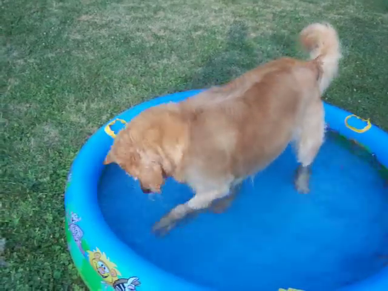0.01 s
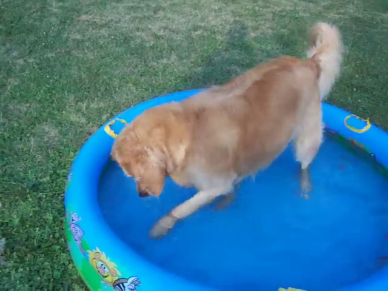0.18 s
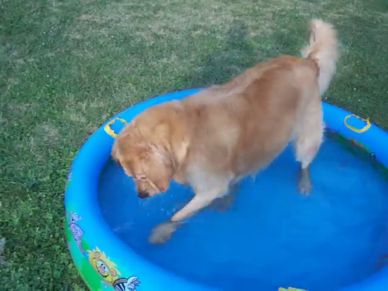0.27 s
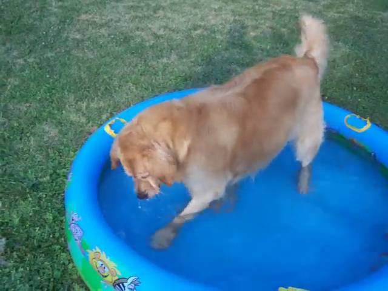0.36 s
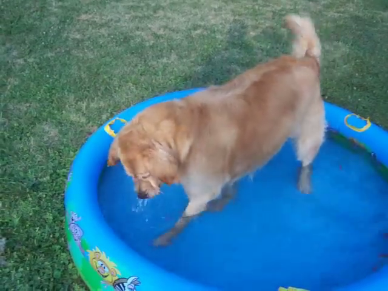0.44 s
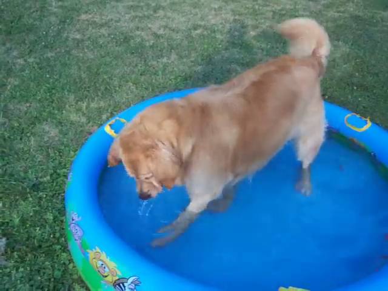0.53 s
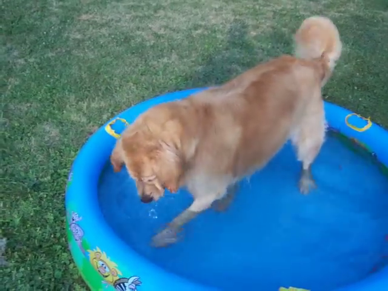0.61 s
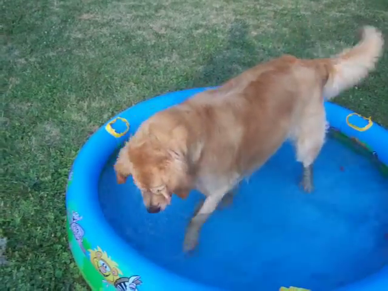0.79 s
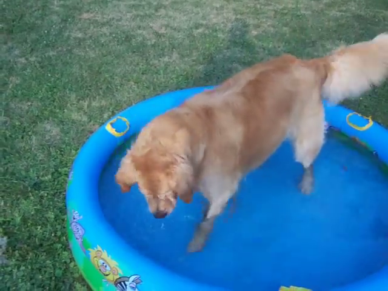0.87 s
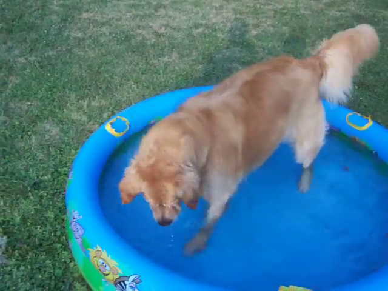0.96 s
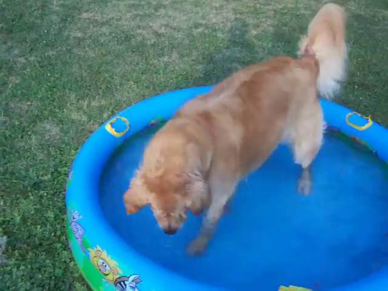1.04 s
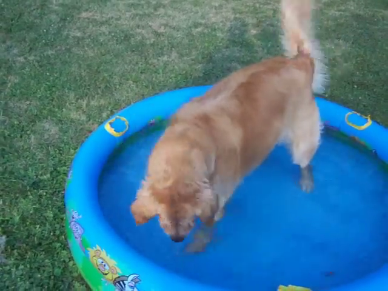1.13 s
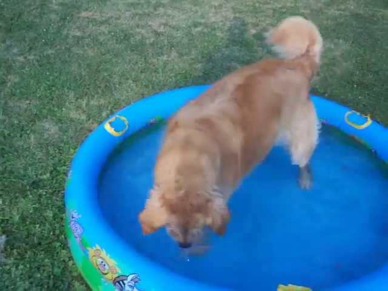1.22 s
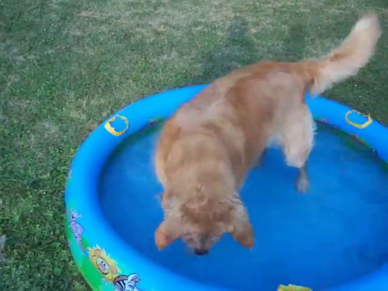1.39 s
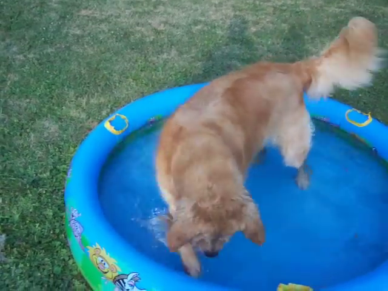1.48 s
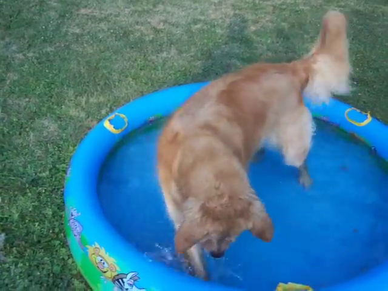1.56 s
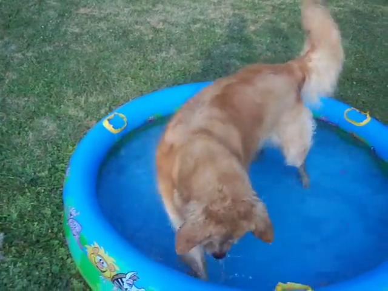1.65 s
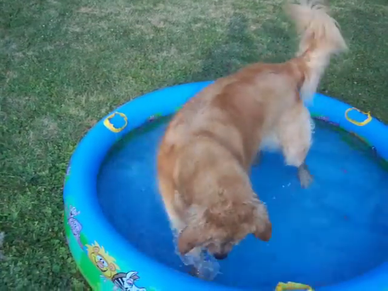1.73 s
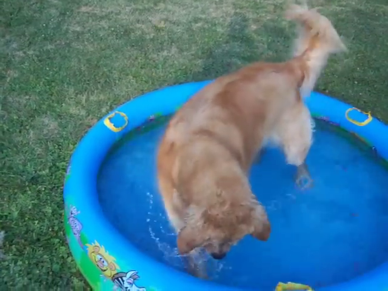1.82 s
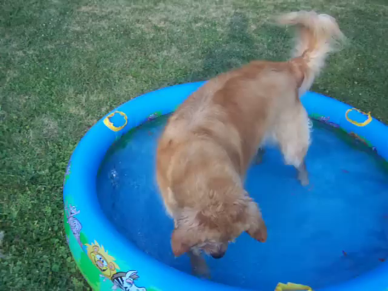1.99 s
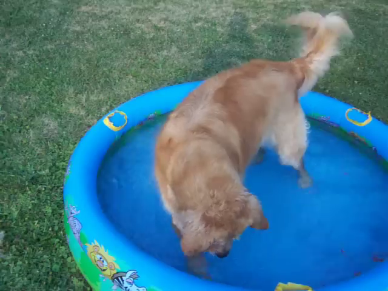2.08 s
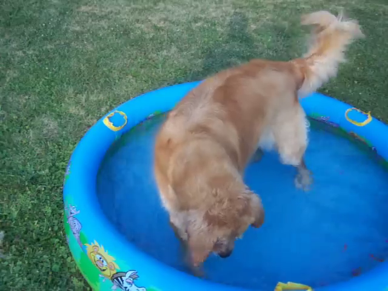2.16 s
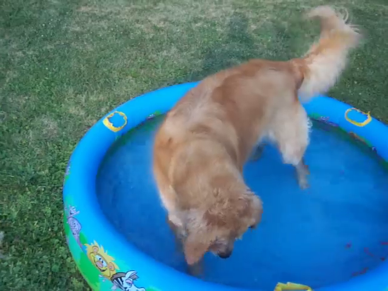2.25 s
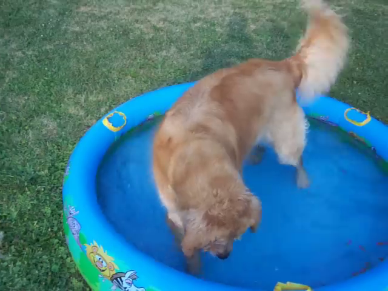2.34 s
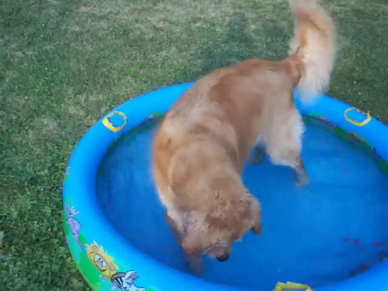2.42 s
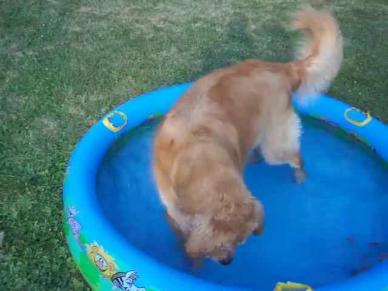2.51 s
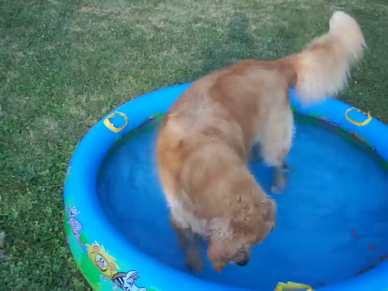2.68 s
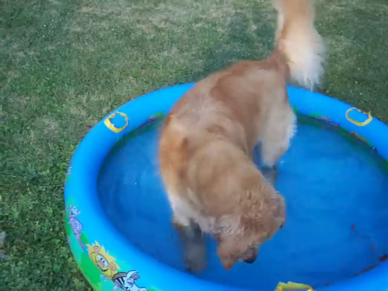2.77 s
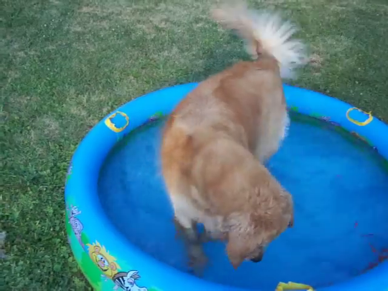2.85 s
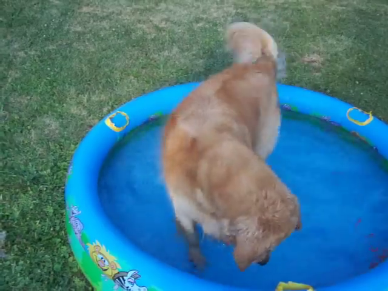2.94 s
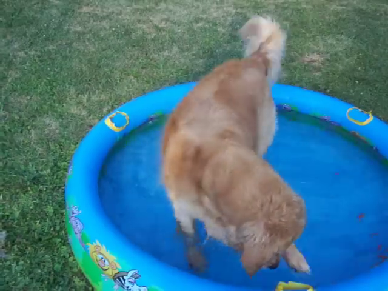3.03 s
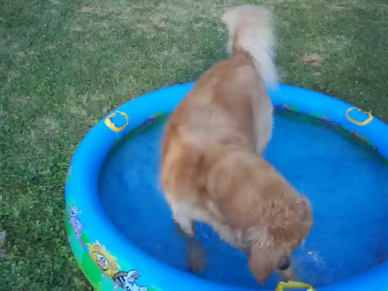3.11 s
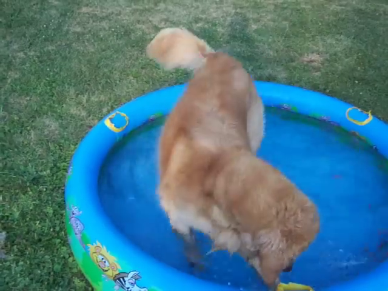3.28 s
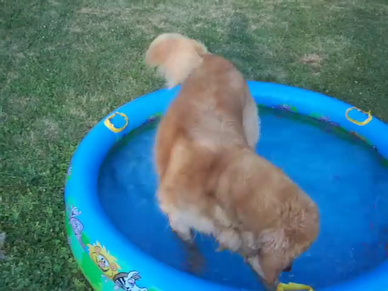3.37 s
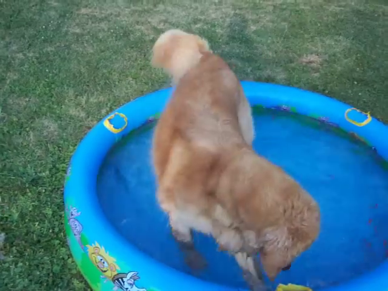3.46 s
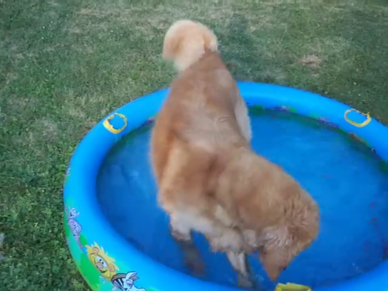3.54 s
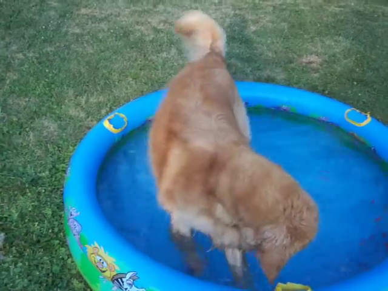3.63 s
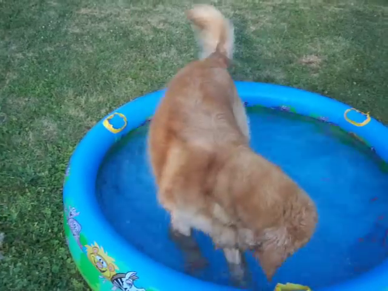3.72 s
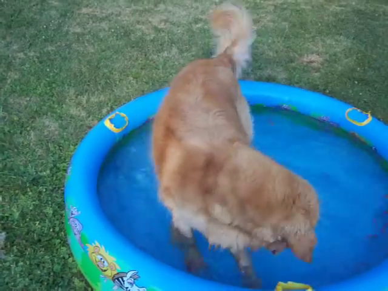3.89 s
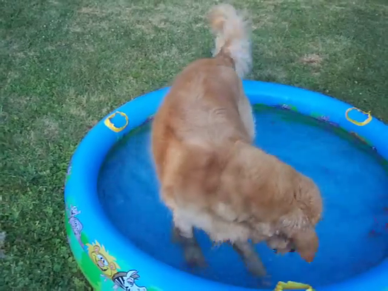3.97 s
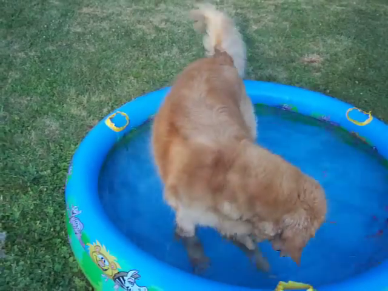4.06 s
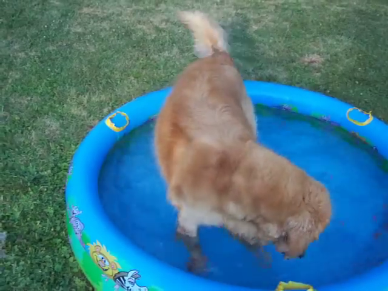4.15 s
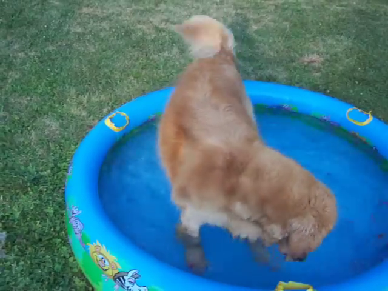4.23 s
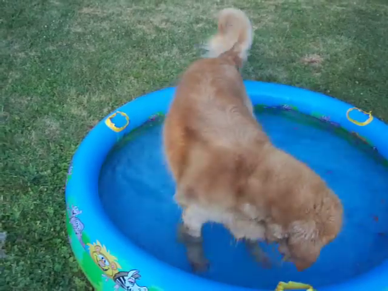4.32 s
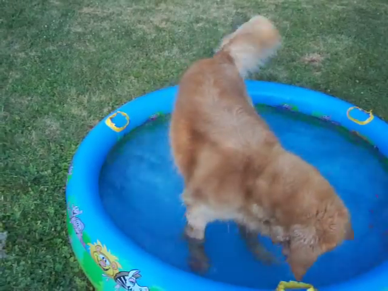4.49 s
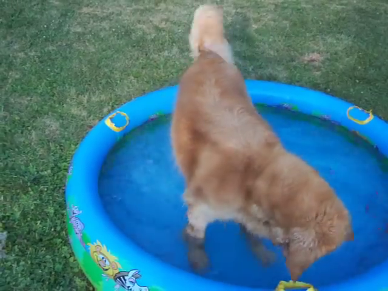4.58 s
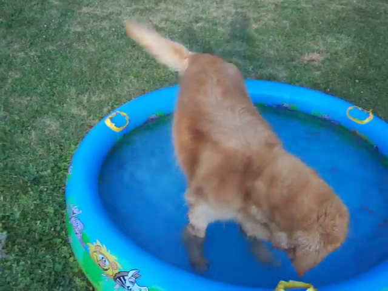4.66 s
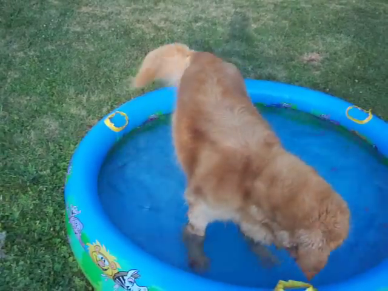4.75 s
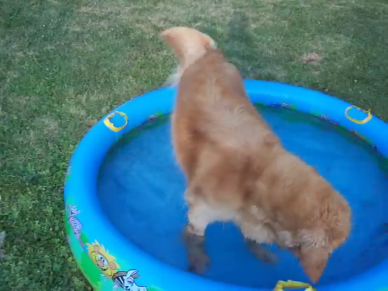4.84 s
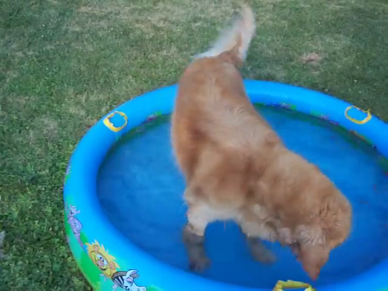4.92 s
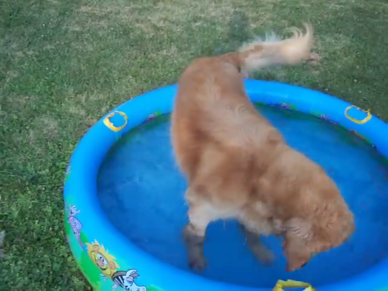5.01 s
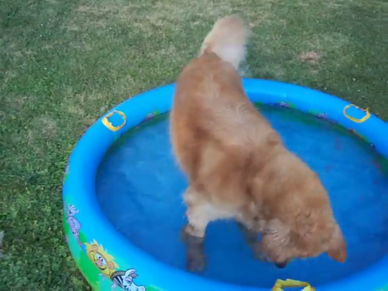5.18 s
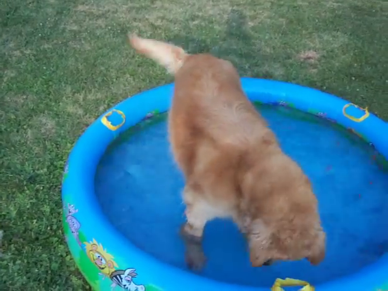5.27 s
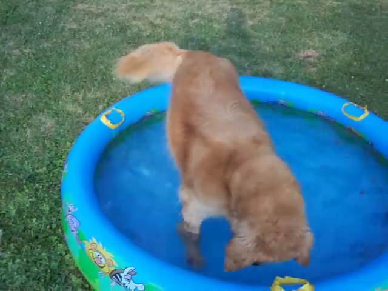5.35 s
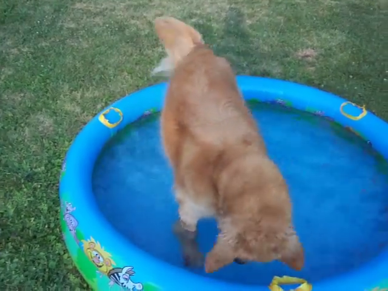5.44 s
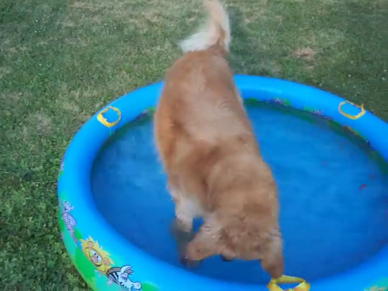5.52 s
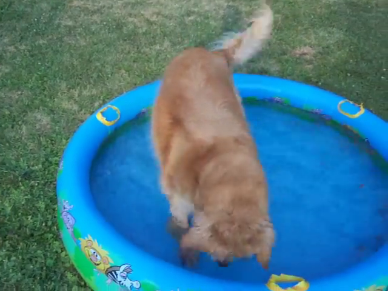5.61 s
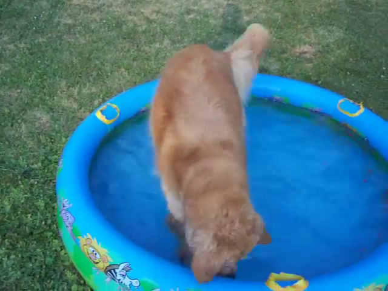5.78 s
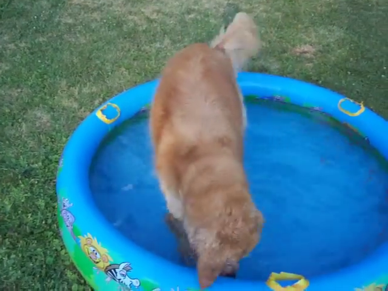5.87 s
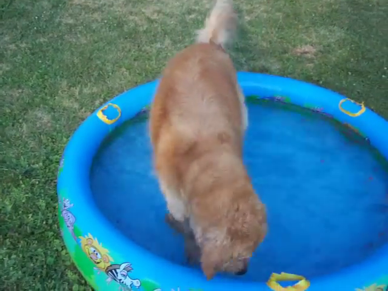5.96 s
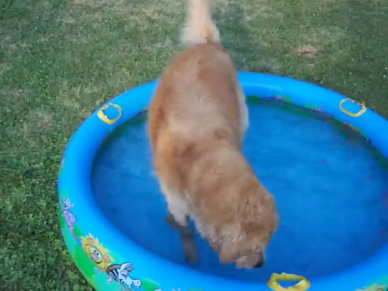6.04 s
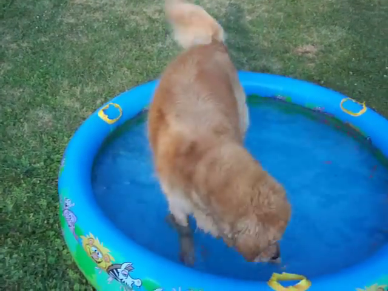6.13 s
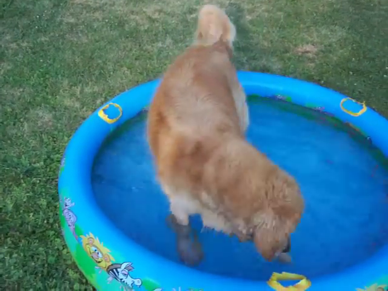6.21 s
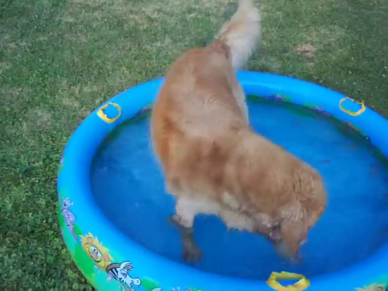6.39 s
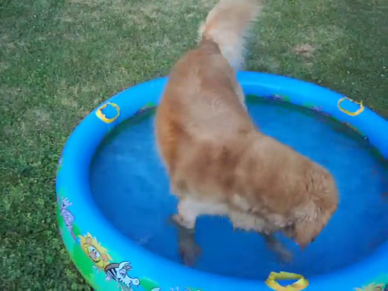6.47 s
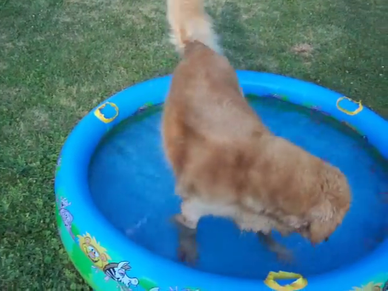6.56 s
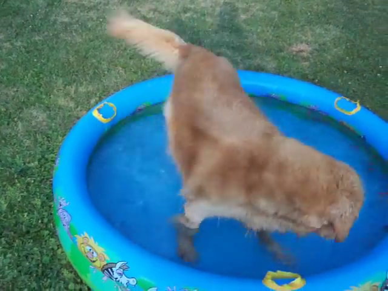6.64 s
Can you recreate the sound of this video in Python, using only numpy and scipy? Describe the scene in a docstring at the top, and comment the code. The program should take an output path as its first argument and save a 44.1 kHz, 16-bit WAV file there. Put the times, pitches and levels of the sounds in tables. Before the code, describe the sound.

Bursts of crisp splashing from a dog's paw in a kiddie pool, then quick high bird chirps, over a steady, dull distant traffic rumble.

```python
"""Dog pawing a small pool

A dog paws the shallow water of a small inflatable pool on a lawn: drops, gulps and splashes are
decaying sines, and spray is a mass of tiny rings over filtered noise. Small birds twitter past overhead
as gliding sines, the far ones blurred by echoes. Distant traffic, shaped noise, roars and slowly swells.
The whole sound is dull above 6 kHz, ends steeply near 9 kHz and is clipped at its strongest peaks."""
import sys
import numpy as np
from scipy import signal
from scipy.fft import rfft, irfft, next_fast_len
from scipy.io import wavfile
from scipy.ndimage import uniform_filter1d

SR = 44100
rng = np.random.default_rng(int(sys.argv[2]) if len(sys.argv) > 2 else 0)


def gain_from_decibels(decibels):
    """Convert decibel values to linear amplitude factors."""
    exponent = np.asarray(decibels, float) / 20
    return 10 ** exponent


def inscribe(sig):
    """Save sig as 16-bit PCM at rate SR to the path in sys.argv[1].

    A 1-D sig is mono; a 2-D sig holds one channel per row.
    Samples are clipped to [-1, 1] before scaling.
    """
    pcm = np.round(np.clip(np.atleast_2d(sig).T, -1, 1) * 32767)
    wavfile.write(sys.argv[1], SR, pcm.astype(np.int16))


N = 295470  # length of the scene in samples

# single drops and slaps: (time [s], relative peak level [dB], ring frequency [Hz], 60 dB decay time [s])
WATER_DROPS = [(0.0817, -15.5, 4360, 0.017), (0.101, -18.5, 5560, 0.013), (.177, -20.5, 3340, 0.012),
               (.323, -22.5, 3200, .011), (.34, -30, 3330, .0036), (0.3813, -0.5, 3800, 0.0014),
               (.4023, -20, 3060, .014), (0.409, -15.5, 3800, 0.0052), (.45, -13, 4260, 0.025),
               (0.4807, -14.5, 5120, 0.026), (0.575, -21, 3740, 0.023), (.647, -19, 2280, 0.018),
               (.658, -12.5, 3880, 0.0064), (0.6893, -4, 4380, 0.005), (.703, -5, 3080, 0.0062),
               (.7525, -16, 3700, .0046), (0.9185, -10, 3540, .004), (0.9424, -17.5, 2510, 0.022),
               (.973, -19.5, 3700, 0.012), (1.011, -11.5, 3200, 0.0033), (1.0545, -20.5, 6000, .017),
               (1.0733, -16.5, 2830, 0.0056), (1.0798, -20, 3170, .007), (1.108, -13, 3660, .007),
               (1.123, -9, 4400, 0.0054), (1.1424, -9.5, 3430, 0.011), (1.225, -14.5, 4000, 0.018),
               (1.36, -18, 2230, .0095), (1.4697, -11, 4020, 0.0086), (1.4892, -5, 2900, 0.0097),
               (1.5168, -5.5, 5380, 0.0068), (1.526, -3, 3880, 0.0043), (1.552, -1, 4430, .0044),
               (1.5718, -11, 5420, .014), (1.5765, -10, 2810, 0.013), (1.6026, -17, 5900, .014),
               (1.646, -4.5, 3120, 0.006), (1.668, -4, 4500, 0.016), (1.6778, -4.5, 4360, 0.008),
               (1.6825, -15, 4680, 0.011), (1.6994, -14, 3070, .0059), (1.721, -13.5, 3030, 0.019),
               (1.74, -9, 4230, 0.018), (1.796, -23, 4350, .009), (1.82, -17, 4260, .015),
               (1.855, -14, 3150, 0.023), (1.8603, -13, 3470, 0.016), (1.88, -10, 3850, .0092),
               (1.904, -13.5, 3710, .026), (1.9233, -15, 3850, 0.0034), (1.9283, -16, 3660, 0.005),
               (1.9401, -15, 4730, 0.0076), (2.0076, -10, 3800, 0.0028), (2.0746, -18, 3800, 0.026),
               (2.801, -16, 4080, 0.009), (3.0592, -2.5, 3850, 0.0069), (3.0679, 1, 4040, 0.0068),
               (3.087, -10.5, 5720, 0.009), (3.1002, -6.5, 4170, 0.0035), (3.1198, -4, 5000, 0.0037),
               (3.1223, 2.5, 2930, 0.0066), (3.1516, -8.5, 3290, 0.023), (3.202, -4, 4600, 0.0094),
               (3.2076, -8, 4100, .022), (3.2556, -12, 4500, 0.031), (3.279, -8.5, 4270, 0.01),
               (3.3223, -6, 3100, 0.011), (3.396, -14, 2310, 0.022), (3.4189, -16, 4100, .01),
               (3.7087, -22, 4360, 0.016), (5.6615, -20, 4700, 0.028), (5.721, -29, 2930, 0.018),
               (5.754, -17, 5100, .0081), (5.9313, -7, 3620, 0.0059), (6.0216, -18, 4130, 0.0045),
               (6.343, -17, 3850, 0.0072)]
# air pockets closing under the paw: (time [s], relative level [dB], starting pitch [Hz],
# 60 dB decay time [s], half the pitch change over it, negative falls [ratio])
AIR_POCKETS = [(.442, -15, 274, 0.022, 0.019), (.47, -16, 480, 0.021, 0.12),
               (1.306, -21.5, 402, 0.11, 0.19), (1.344, -14, 705, 0.021, -0.049),
               (1.654, -4, 518, 0.017, 0.16), (1.667, -21, 418, 0.028, 0.014), (1.856, -19, 994, 0.052, .1),
               (2.942, -14, 937, 0.038, 0.084), (3.133, -6.5, 710, 0.014, -0.13),
               (3.287, -14, 690, 0.045, -0.049), (3.296, -11, 500, 0.04, -0.057),
               (3.308, -9, 362, 0.044, 0.061), (3.341, 6.5, 546, 0.032, -0.16),
               (3.341, -11, 293, 0.11, -0.076), (3.356, -21.5, 400, 0.069, 0.054),
               (3.398, -19, 342, 0.065, 0.22), (3.479, -19.5, 648, 0.062, 0.066),
               (3.514, -20.5, 370, 0.059, .05), (3.539, -10, 301, 0.035, 0.12),
               (3.549, -15, 398, 0.058, 0.098), (3.595, -18.5, 464, 0.042, 0.13),
               (3.932, -23, 564, 0.19, 0.008), (4.024, -18, 430, 0.042, 0.25),
               (5.76, -11.5, 780, 0.023, -0.14), (5.765, -13, 536, 0.025, 0.022)]
# thrown sheets of water landing:
# (time [s], length scale [s], relative rms level [dB], centre frequency [Hz], pitch spread [octaves])
WATER_SHEETS = [(0.434, 0.068, -26, 4680, .45), (0.442, 0.036, -33, 2530, 0.27),
                (1.107, 0.039, -32.5, 3540, .6), (1.313, 0.092, -37, 1860, 0.55),
                (1.383, 0.14, -35, 2690, 1.3), (1.514, 0.021, -22, 5410, 0.42),
                (1.541, 0.031, -25.5, 4500, 0.72), (1.569, 0.034, -27.5, 4300, 0.7),
                (1.597, 0.1, -27, 4050, 0.5), (1.642, .022, -24, 4300, 0.45),
                (1.648, 0.028, -38, 516, 0.88), (1.664, 0.0048, -18.5, 1520, 1),
                (1.676, 0.0049, -22.5, 2200, 0.94), (1.678, 0.0052, -18.5, 4690, 0.34),
                (1.849, 0.076, -32.5, 3790, 1.8), (1.906, 0.013, -33, 3960, 0.2),
                (1.921, 0.012, -21, 3540, 0.24), (2.936, .05, -29.5, 2540, 0.74),
                (3.1204, 0.003, -19, 4600, 0.34), (3.123, 0.037, -21, 4270, 0.48),
                (3.19, 0.026, -24, 4480, 0.32), (3.246, 0.076, -28, 3870, 0.64),
                (3.29, 0.054, -31.5, 4200, 0.49), (3.341, 0.069, -43, 510, 0.44),
                (5.723, 0.0087, -31.5, 3570, 0.51), (6.013, 0.095, -35, 4500, 0.63)]
# how hard the water is churned: (time [s], spray level [dB])
CHURNING = [(0, -41), (.58, -40.5), (.73, -37.5), (1.41, -37), (1.72, -34.5), (1.85, -30), (2.1, -36),
            (2.2, -40.5), (2.85, -41), (2.99, -30), (3.2, -28), (3.72, -31), (3.78, -41.5), (4.23, -38),
            (4.67, -44.5), (6.7, -44)]
# filter that colours the spray: (frequency [Hz], relative gain [dB])
SPRAY_SPECTRUM = [(200, -44), (400, -22.5), (600, -11.5), (1040, -17.5), (2000, -8.5), (3900, -3),
                  (6200, -12.5), (8500, -14.5)]
# the clearest pinpoint droplets: (time [s], peak level [dB], starting ring frequency [Hz])
CLEAR_DROPLETS = [(0.099, -17, 7500), (.193, -23, 8100), (.742, -19.5, 7050), (1.0108, -19, 8000),
                  (1.121, -33.5, 6910), (1.494, -11, 7700), (1.5242, -6, 7600), (1.5474, -7, 7750),
                  (1.5767, -19, 6960), (1.666, -18, 7140), (1.7108, -32, 7100), (1.8238, -7.5, 7770),
                  (1.963, -18.5, 6860), (2.4628, -24, 7000), (2.7498, -13, 7060), (3.0636, -34.5, 6940),
                  (3.5106, -34, 6960), (3.597, -2, 7740), (6.1384, -23, 7020), (6.2714, -18.5, 7500)]
# short, mostly falling chips of the nearer birds:
# (start [s], length [s], starting pitch [Hz], end pitch [Hz], level before fade and flutter [dB])
BIRD_CHIPS = [(2.106, 0.016, 7070, 3980, -17), (2.167, 0.033, 6680, 3810, -23),
              (2.217, 0.013, 5830, 3800, -25), (2.229, 0.013, 6260, 4100, -24.5),
              (2.234, .011, 5430, 3300, -24), (2.307, 0.026, 6550, 3660, -22),
              (2.362, .009, 5750, 6440, -26.5), (2.384, 0.029, 5800, 3500, -22.5),
              (2.391, 0.015, 5920, 4000, -27), (2.449, 0.016, 5700, 3480, -24),
              (2.471, 0.011, 6880, 5100, -23), (2.543, .046, 6900, 3100, -18.5),
              (2.552, 0.012, 6800, 5000, -26), (2.61, 0.016, 5100, 4950, -23.5),
              (2.65, .019, 6740, 3600, -14), (2.729, .042, 5490, 3280, -20.5),
              (2.739, 0.007, 6200, 4740, -17), (2.769, 0.017, 7300, 4300, -17),
              (2.823, 0.0096, 6900, 5000, -25), (2.844, 0.026, 6200, 3680, -22.5),
              (2.868, 0.0085, 6400, 5400, -17), (2.877, 0.021, 6270, 3930, -16),
              (2.886, 0.046, 6000, 3200, -20.5), (2.901, .009, 7000, 4970, -23),
              (2.958, 0.026, 4660, 4190, -25.5), (2.967, .013, 5230, 5650, -26.5),
              (2.98, .006, 6220, 5200, -25), (3.007, 0.042, 6000, 3800, -18.5),
              (3.013, 0.015, 6170, 4880, -22.5), (3.048, .008, 5940, 5600, -17),
              (3.077, .022, 5940, 3870, -22), (3.179, 0.012, 5980, 5570, -24),
              (3.194, 0.0079, 6640, 5420, -30.5), (3.232, 0.025, 6860, 4450, -21),
              (3.246, .008, 5340, 4960, -24), (3.353, .016, 6410, 4900, -19), (3.44, .026, 5630, 3580, -20),
              (3.363, 0.0056, 6800, 5700, -29), (3.465, 0.024, 4860, 4400, -29),
              (3.485, 0.016, 6600, 5100, -22), (3.54, .023, 4870, 3900, -21),
              (3.603, 0.046, 5760, 3710, -21.5), (3.657, 0.012, 6600, 5640, -20),
              (3.735, .011, 4570, 3680, -20), (3.769, 0.025, 6360, 3970, -23.5),
              (3.776, 0.052, 6450, 3460, -16), (3.904, 0.038, 5900, 3280, -20.5),
              (3.924, 0.016, 5200, 3930, -27), (3.952, 0.033, 6050, 3640, -23),
              (3.976, .031, 5300, 3440, -24), (4.068, 0.032, 6760, 3400, -17),
              (4.119, 0.027, 6480, 4020, -20.5), (4.135, 0.041, 6000, 3700, -24.5),
              (4.171, 0.034, 6750, 4270, -21.5), (4.241, 0.031, 5640, 4050, -27),
              (4.256, 0.0062, 6530, 5320, -18), (4.308, 0.041, 5840, 3900, -26),
              (4.346, .010, 5980, 4500, -21), (4.416, 0.017, 5650, 3480, -20),
              (4.502, .014, 5650, 3510, -19.5), (4.587, 0.0045, 5500, 5180, -24.5),
              (4.659, 0.026, 5170, 3790, -27), (4.743, .007, 5650, 5400, -28),
              (4.852, 0.012, 6260, 5360, -29), (4.941, 0.021, 5720, 4250, -28),
              (5.075, .020, 5150, 3900, -33), (5.317, 0.011, 6750, 5530, -26.5)]
# long calls, most from one bird that repeats about five times a second:
# (start [s], length [s], top pitch [Hz], level before shape and flutter [dB])
BIRD_CALLS = [(3.431, .042, 6700, -19.5), (3.622, .054, 7460, -14.5), (3.814, 0.058, 7410, -16.5),
              (4.008, .061, 7540, -17.5), (4.203, .070, 7260, -20), (4.409, .057, 7110, -24.5),
              (4.452, .063, 6960, -31.5), (4.615, 0.082, 7000, -32.5)]
# shape of a long call, a drop, a sloping shelf and a slide:
# (share of length [ratio], share of top pitch [ratio], relative level [dB])
CALL_SHAPE = [(0, 1, 1.5), (.13, .915, -0.5), (.58, .8, 0.5), (.75, .67, -10), (1, 0.58, -9.5)]
# far birds gather, pass and leave: (time [s], level before the opening fade [dB])
FLOCK_LEVEL = [(1.9, -43.5), (3.0, -47.5), (3.9, -46), (4.4, -40.5), (4.9, -37.5), (5.7, -39), (6.3, -46),
               (6.7, -52)]
# spectrum of the traffic roar: (frequency [Hz], relative density [dB per Hz])
ROAR_SPECTRUM = [(12, -39), (20, -7.5), (86, 1.5), (158, -0.5), (259, -5.5), (360, -6.5), (520, -2),
                 (760, -2), (1090, -2), (1440, -3), (1910, -9), (3780, -15), (5500, -17.5), (7500, -29)]
# the roar swells as it nears: (time [s], relative level [dB])
ROAR_LEVEL = [(0, -36), (3.2, -34), (3.5, -32), (6.7, -30.5)]
# treble roll-off of the whole sound, with a steep cutoff near 9 kHz: (frequency [Hz], gain [dB])
TREBLE_ROLLOFF = [(5800, -0.5), (6500, -4.5), (7200, -10.5), (8000, -16), (8700, -25.5), (9300, -75.5),
                  (10000, -87.5)]


def evened(x):
    """Normalisation to unit rms."""
    return x / np.sqrt(np.mean(x ** 2) + 1e-20)


def smoothed(x, size):
    """Low-pass smoothing by two running means of the given number of samples."""
    return uniform_filter1d(uniform_filter1d(x, size=size), size=size)


def read(points, hz):
    """Interpolation of a spectrum along logarithmic frequency."""
    f, value = np.transpose(points)
    return np.interp(np.log(hz + 1), np.log(f + 1), value)


def curve(rows, t):
    """Linear interpolation of each column of a table over its first column."""
    s, *columns = np.transpose(rows)
    return [np.interp(t, s, c) for c in columns]


def add(mix, s, sound):
    """Superposition: a sound joins the mix at s seconds."""
    part = mix[round(s * SR):][:len(sound)]
    part += sound[:len(part)]


def colour(x, points):
    """Zero-phase filtering: a dB response multiplies the spectrum without delay."""
    size = next_fast_len(len(x) + 4096)
    gain = gain_from_decibels(read(points, np.fft.rfftfreq(size, 1 / SR)))
    return irfft(rfft(x, size) * gain, size)[:len(x)]


def ring(hz, t60, rise, length):
    """Bubble resonance: a dying sine whose pitch glides up or, if rise is negative, down."""
    t = np.arange(length) / SR
    return gain_from_decibels(-60 * t / t60) * np.sin(2 * np.pi * hz * (t + rise * t ** 2 / t60))


def tail(x, t60):
    """Multiple reflection from fences and walls: sparse echoes of random sign that die away."""
    at = np.arange(400, SR // 2, 20)
    taps = np.zeros(SR // 2 + 20)
    signs = rng.choice([-1., 1.], len(at))
    taps[at + rng.integers(0, 20, len(at))] = signs * gain_from_decibels(-60 * at / SR / t60)
    return signal.fftconvolve(x, taps / np.linalg.norm(taps))[:N]


def drops(dive_s=0.00038, dive_top_hz=6000, dive_share=0.28, rough_per_cycle=0.014, rise_s=0.0003):
    """Cavity resonance: each plink dives in pitch to the ring of the cavity it leaves; long rings are ragged."""
    out, chance = np.zeros(N), rng.standard_normal((len(WATER_DROPS), 2000))
    t = np.arange(2000) / SR
    for (s, db, hz, t60), noise in zip(WATER_DROPS, chance):
        rough = np.clip(rough_per_cycle * hz * t60, 0, .3)
        flutter = 1 - rough + rough * evened(smoothed(noise, 24))
        # the plink starts a share of the way from its ring up to the top pitch
        dive_hz = dive_share * max(dive_top_hz - hz, 0)
        turns = hz * t + dive_hz * dive_s * (1 - np.exp(-t / dive_s))
        attack = np.sin(np.pi / 2 * np.minimum(t / rise_s, 1)) ** 2
        shape = attack * gain_from_decibels(-60 * t / t60) * flutter
        add(out, s, gain_from_decibels(db + 2.5) * shape * np.sin(2 * np.pi * turns))
    return out


def gulps(rough=0.37, start_s=0.0028):
    """Large-bubble resonance: low rings with a soft start, shaken ragged by the water around them."""
    out, start = np.zeros(N), 1 - np.exp(-np.arange(6000) / SR / start_s)
    chance = rng.standard_normal((len(AIR_POCKETS), 6000))
    for (s, db, hz, t60, rise), noise in zip(AIR_POCKETS, chance):
        flutter = 1 + rough * evened(smoothed(noise, 90))
        add(out, s, gain_from_decibels(db) * start * flutter * ring(hz, t60, rise, length=6000))
    return out


def splashes(per_s=4000, cycles=15, spread_db=4.0):
    """Superposed resonances: bubbles and droplets land together, pitched in a band set by their size."""
    out, t = np.zeros(N), np.arange(400) / SR
    chance = rng.random((len(WATER_SHEETS), 400, 4))  # at most 400 rings in a splash
    for (s, length, db, centre_hz, width), draws in zip(WATER_SHEETS, chance):
        when, size, a, b = draws[:round(per_s * 1.4 * length) + 8].T
        hz = centre_hz * 2 ** (2.355 * width * (a + b - 1))  # triangular spread in octaves
        envelope = np.minimum(when / 0.083, 1) * np.exp(-(1.57 * when) ** 3)
        level = gain_from_decibels(-spread_db * np.log(size + 0.025)) * np.sqrt(hz / centre_hz) * envelope
        swarm = np.zeros(round(1.34 * length * SR) + len(t))
        for w, f, g in zip(when, hz, level):
            attack = np.minimum(t * f, 1)  # one cycle long
            add(swarm, 1.4 * length * w, g * attack * ring(f, cycles / f, 0.012, length=400))
        add(out, s, gain_from_decibels(db - 0.5) * evened(swarm))
    return out


def spray(grains_per_s=2500, spread_db=3.5, fizz_db=-3, clump_db=3.57):
    """Random superposition: tiny rings, a few of them large, over a fine noise fizz; bursts come in clumps."""
    t = np.arange(N) / SR
    clumps = gain_from_decibels(clump_db * evened(smoothed(rng.standard_normal(N), 300)))
    present = rng.random(N) < grains_per_s / SR
    size = gain_from_decibels(spread_db * np.minimum(rng.exponential(1, N), 4)) * present
    kind, grains = rng.integers(0, 24, N), np.zeros(N)
    for k, hz in enumerate(np.geomspace(900, 9000, num=24)):
        grain = hz * ring(hz, 14 / hz, 0.18, length=700)
        grains += signal.oaconvolve(size * (kind == k), grain)[:N]
    mix = evened(grains) + gain_from_decibels(fizz_db) * rng.standard_normal(N)
    return gain_from_decibels(curve(CHURNING, t)[0]) * evened(clumps * colour(mix, SPRAY_SPECTRUM))


def ticks(per_s=50, over_spray_db=7, t60=0.0047):
    """Small-bubble resonance: pinpoint droplets ring only in the treble; faint ones follow the churning."""
    faint, clear = np.zeros((2, N))
    for s, pitch, size in rng.random((round(per_s * N / SR), 3)):
        droplet = ring(5800 + 2800 * pitch, t60, .02, length=300)
        add(faint, s * N / SR, gain_from_decibels(-5 * np.log(size + 0.04)) * droplet)
    for s, db, hz in CLEAR_DROPLETS:
        add(clear, s, gain_from_decibels(db) * ring(hz, t60, 0.018, length=300))
    return clear + faint * gain_from_decibels(curve(CHURNING, np.arange(N) / SR)[0] + over_spray_db)


def whistle(pitch, level_db, noise, flutter_db=2, edge_s=0.00051):
    """Frequency modulation: a near-sine glide whose strength flutters at random, as over several sound paths."""
    t = np.arange(len(pitch)) / SR
    pitch = uniform_filter1d(pitch, size=40, mode="nearest")
    flutter = evened(smoothed(noise, 120))[:len(t)]
    edge = np.minimum(np.minimum(t, t[-1] - t) / edge_s, 1)
    return gain_from_decibels(level_db + flutter_db * flutter) * edge * np.sin(2 * np.pi * np.cumsum(pitch) / SR)


def chips(rise_s=0.00088, fade_db=-20.5, knee_hz=4500, drop_hz_per_s=230000, slide_hz_per_s=45000):
    """Two-rate glide: a chip swells at once, moves steeply, slides below the knee if time is left, and fades."""
    out = np.zeros(N)
    chance = rng.standard_normal((len(BIRD_CHIPS), 4000))
    for (s, length, top_hz, end_hz, db), noise in zip(BIRD_CHIPS, chance):
        t = np.arange(0, length, 1 / SR)
        spare_s = length - abs(top_hz - knee_hz) / drop_hz_per_s
        slide_s = max(min((knee_hz - end_hz) / slide_hz_per_s, spare_s), 0)
        drop = np.minimum(t / (length - slide_s), 1) ** 1.15
        slide_hz = end_hz + slide_hz_per_s * np.minimum(length - t, slide_s)
        pitch = top_hz + (slide_hz - top_hz) * drop
        fallen = (top_hz - pitch) / (top_hz - end_hz)
        swell_db = -8 * np.maximum(1 - t / rise_s, 0)
        add(out, s, whistle(pitch, db + fade_db * fallen ** 2.7 + swell_db, noise))
    return out


def long_calls(lead_s=0.001, lead_pitch=4.9):
    """Scaled glide: one shape, stretched to each call, opens with a very fast drop from above."""
    out = np.zeros(N)
    chance = rng.standard_normal((len(BIRD_CALLS), 4000))
    for (s, length, top_hz, db), noise in zip(BIRD_CALLS, chance):
        t = np.arange(-lead_s, length, 1 / SR)
        pitch, level_db = curve(CALL_SHAPE, t / length)
        pitch = pitch + (lead_pitch - 1) * np.maximum(-t / lead_s, 0)
        add(out, s - lead_s, whistle(top_hz * pitch, db + level_db, noise))
    return out


def flock(calls_per_s=330):
    """Diffuse reflection: faint falling chirps of unequal strength, mostly heard as their echoes."""
    calls, t = np.zeros(N), np.arange(900) / SR
    for s, a, b, fall, size in rng.random((round(calls_per_s * N / SR), 5)):
        pitch = 5700 + 1100 * (a + b) - 40000 * (0.74 + fall) * t
        chirp = np.hanning(len(t)) * np.sin(2 * np.pi * np.cumsum(pitch) / SR)
        add(calls, s * N / SR, gain_from_decibels(-2.5 * np.log(size + .05)) * chirp)
    blurred = 0.2 * calls + tail(calls, 0.37)
    t = np.arange(N) / SR
    fade_in = np.clip((t - 1.9) / 0.71, 0, 1)
    return evened(blurred) * gain_from_decibels(curve(FLOCK_LEVEL, t)[0]) * fade_in


def traffic(patchy_db=0.5, bright_db_per_octave=0.12):
    """Spectral shaping of noise: random short-time spectra with faint drifting patches."""
    frames, hz = N // 256 + 5, np.fft.rfftfreq(1024, 1 / SR)
    a, b, patches = rng.standard_normal((frames, 513, 3)).T
    patches = uniform_filter1d(patches, size=8, axis=0)  # along frequency
    patches = evened(uniform_filter1d(patches, size=20, axis=1))  # along time
    octaves = np.log2(np.clip(hz, 200, 6000) / 800)[:, None]
    field_db = read(ROAR_SPECTRUM, hz)[:, None] + patchy_db * patches + bright_db_per_octave * octaves
    noise = signal.istft((a + 1j * b) * gain_from_decibels(field_db), nperseg=1024, noverlap=768)[1][:N]
    return evened(noise) * gain_from_decibels(curve(ROAR_LEVEL, np.arange(N) / SR)[0] + 1.5)


def scene():
    """Superposition of water and birds, each with its echoes, over the far flock and traffic."""
    water = drops() + gulps() + splashes() + spray() + ticks()
    birds = chips() + long_calls()
    water_echo = gain_from_decibels(-13) * tail(water, 0.094)
    bird_echo = gain_from_decibels(-15.5) * tail(birds, 0.66)
    mix = water + water_echo + birds + bird_echo + flock() + traffic()
    return mix[None]


def low_pass(x):
    """Removes everything above the highest recorded frequency."""
    return signal.sosfilt(signal.butter(12, 16500, fs=SR, output="sos"), x)


def record(dry, clip=0.72):
    """Band limiting and overload: the treble is rolled off, then the peaks are hard-clipped."""
    heard = colour(dry[0], TREBLE_ROLLOFF)
    clipped = np.clip(heard, -clip, clip)[None]
    return low_pass(clipped)


dry = scene()
out = record(dry)
inscribe(out)
```